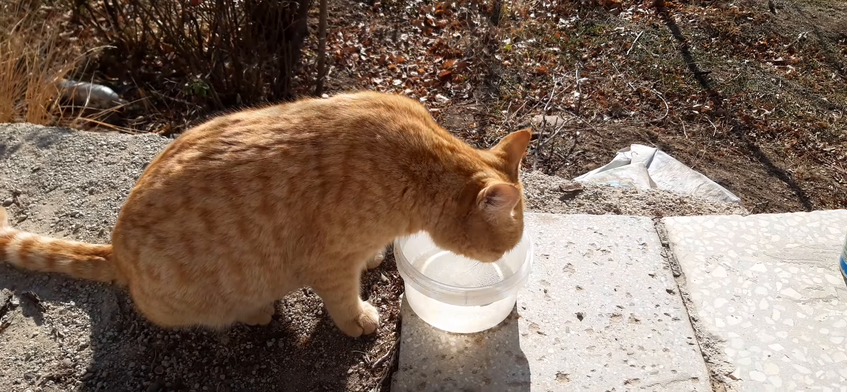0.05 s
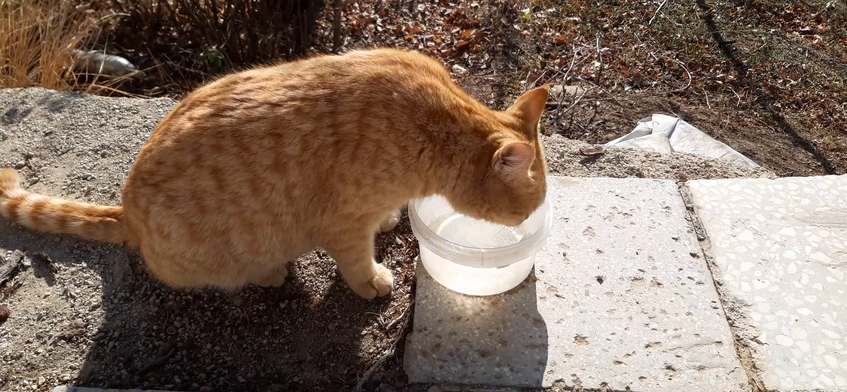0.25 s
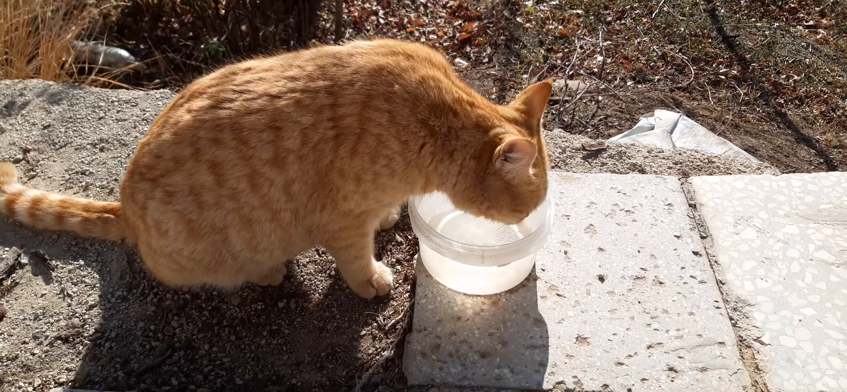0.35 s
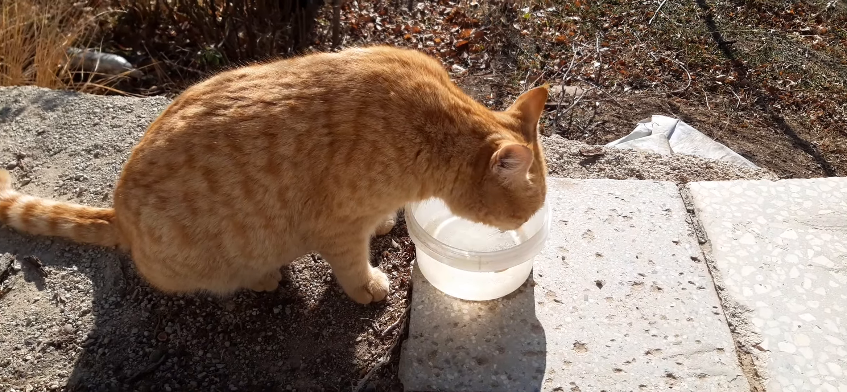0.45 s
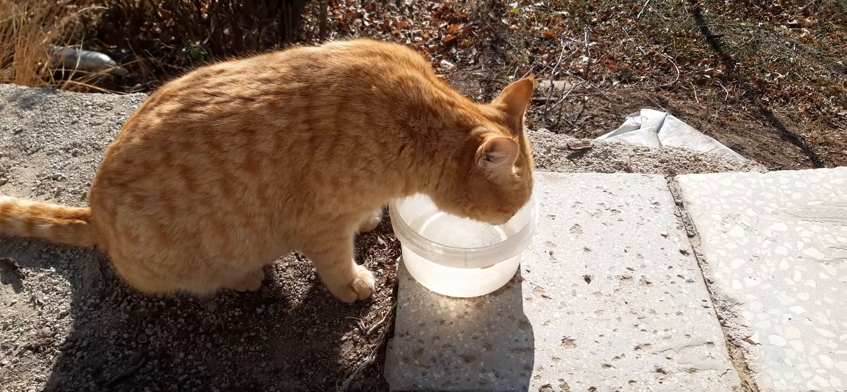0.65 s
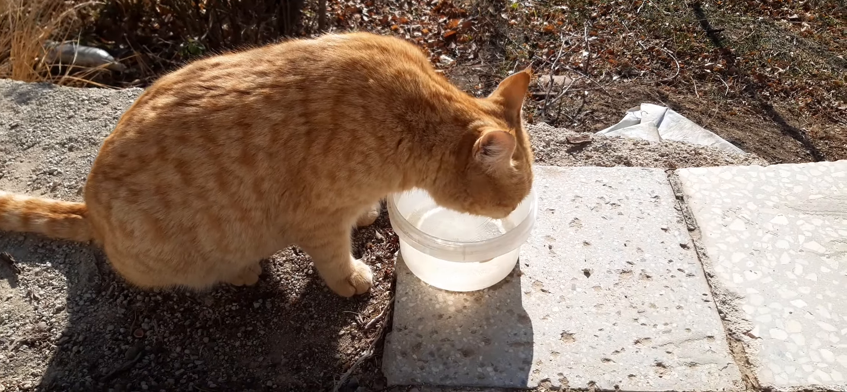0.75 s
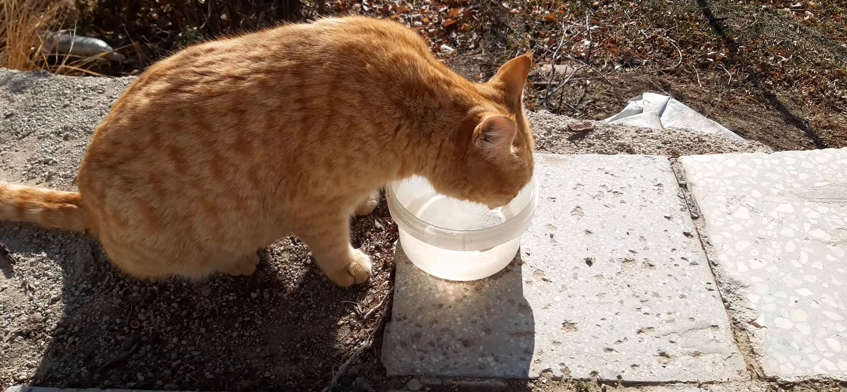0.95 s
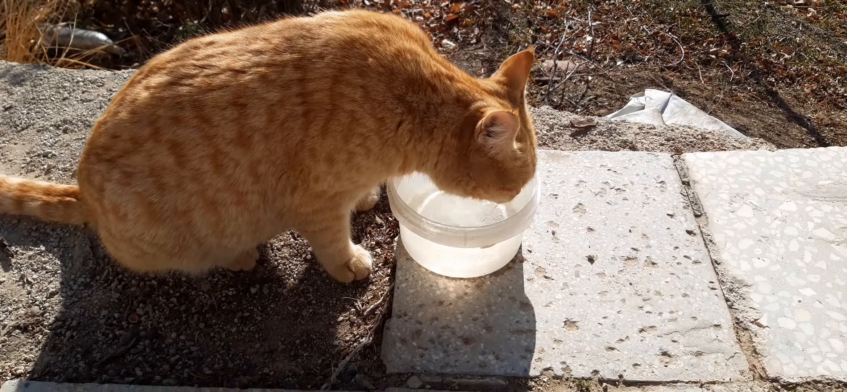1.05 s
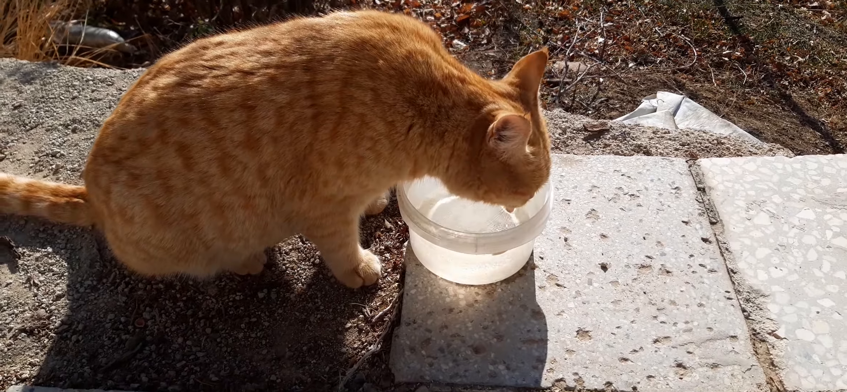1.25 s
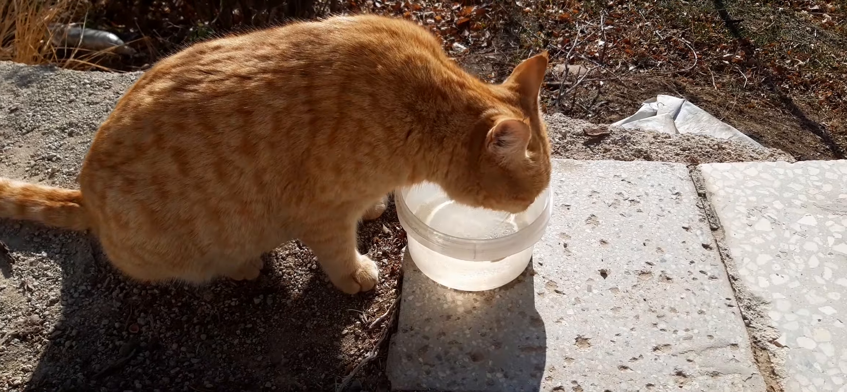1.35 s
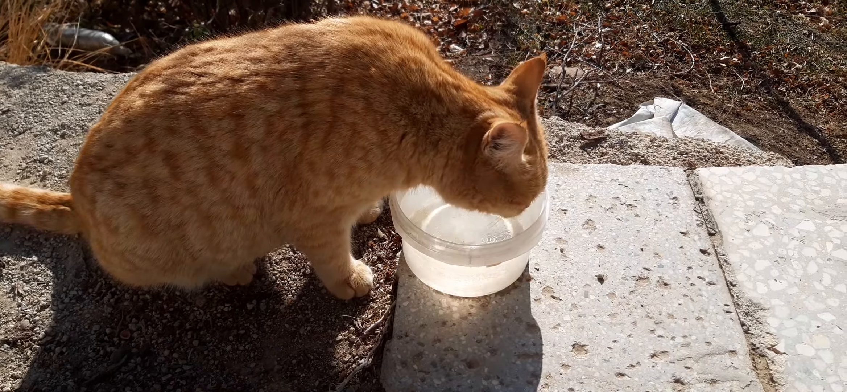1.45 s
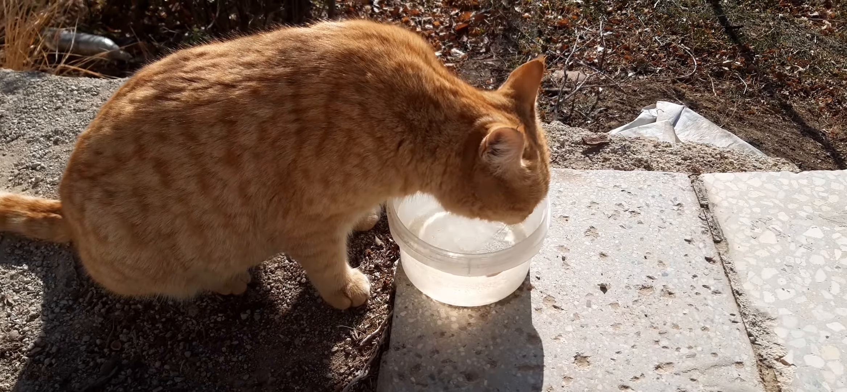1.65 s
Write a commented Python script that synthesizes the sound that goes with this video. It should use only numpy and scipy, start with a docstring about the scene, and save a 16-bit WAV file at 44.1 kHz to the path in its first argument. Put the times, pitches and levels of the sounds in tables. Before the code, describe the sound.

A cat laps water with faint wet ticks, over low wind rumble outdoors.

```python
"""A cat laps water from a plastic bowl on a patio, three to four laps a second.
From the start a light breeze flutters on two microphone ports, over a faint outdoor hiss.
The tongue makes soft wet ticks and tiny ringing bubbles. A few eddies (swirls of air) thump
the ports, hardest just after half a second. The loudest ticks come near the end, at about 1.3 s."""
import sys
import numpy as np
from scipy import signal
from scipy.fft import rfft, irfft, next_fast_len
from scipy.io import wavfile
from scipy.ndimage import uniform_filter1d

SR = 44100
rng = np.random.default_rng(int(sys.argv[2]) if len(sys.argv) > 2 else 0)


def to_wav(s):
    """Save 16-bit WAV."""
    ch = np.atleast_2d(s).T  # columns
    pcm = np.round(np.clip(ch, -1, 1) * 32767)  # PCM
    wavfile.write(sys.argv[1], SR, pcm.astype(np.int16))


N = 74970  # 1.7 s


def amp(db):
    """Turn decibels into a gain."""
    return 10 ** (np.asarray(db) / 20)


def unit(x):
    """Scale to an average (rms) level of 1."""
    return x / np.sqrt(np.mean(x ** 2) + 1e-20)


def along(points, hz):
    """Read between (f/Hz, value) points on a log frequency axis."""
    f, v = np.transpose(points)
    return np.interp(np.log(hz + 1), np.log(f + 1), v)


def curve(rows):
    """Join (t/s, value) points into one value per sample."""
    return np.interp(np.arange(N) / SR, *np.transpose(rows))


def filtered(x, response):
    """Multiply each frequency in x by response(hz)."""
    n = x.shape[-1]
    padded = next_fast_len(n + SR // 4)
    return irfft(rfft(x, padded) * response(np.fft.rfftfreq(padded, 1 / SR)), padded)[..., :n]


def noise(spectrum, size=N):
    """Two unrelated noises with the same tone colour, rms 1."""
    return unit(filtered(rng.standard_normal((2, size)), lambda hz: amp(along(spectrum, hz))))


def pan(db):
    """Left and right gains of constant power; positive db leans left."""
    return unit(amp([[db / 2], [-db / 2]]))


def fade(t, t60):
    """Die away by 60 dB in the time t60."""
    return np.exp(-np.log(1000) * t / t60)


def add(track, s, sound):
    """Mix a sound into a track at s seconds."""
    part = track[:, max(round(s * SR), 0):][:, :sound.shape[-1]]
    part += sound[..., :part.shape[-1]]


def lapping():
    """Each tick of the tongue is a wet snap, a tiny bubble that rings and a spatter of droplets."""
    # the bubbles: t/s, f/Hz, level/dB, fade time/ms, left minus right/dB
    bubbles = [ (0.065, 1900, -66, 14, 2), (0.3824, 2040, -61, 5.6, -1), (0.448, 9400, -67, 8.4, -10),
               (.5240, 8550, -67, 6.6, -17), (0.6041, 10200, -52, 2.1, -17), (0.6054, 2790, -55.5, 5.4, 3),
               (0.608, 1750, -60, 8, 10), (0.8594, 11100, -57.5, 2.2, -25), (0.8627, 2320, -56, 2.7, -3),
               (.9630, 2120, -69, 11, -7), (0.9772, 2200, -60.5, 6.6, -3), (.9780, 8600, -63, 4.8, -16),
               (1.116, 2310, -55, 17.4, -21), (1.2244, 2580, -54.5, 3.7, -15),
               (1.2704, 3006, -46.5, 16.4, 0.5), (1.2839, 2866, -63.5, 32, -6),
               (1.3775, 2120, -47.5, 2.3, 3), (1.3800, 5260, -40.5, 4.3, 4), (1.3804, 2760, -49, 6.2, 0),
               (1.3820, 4940, -61, 14, -2), (1.3826, 8500, -49, 4.4, -49), (1.3841, 10200, -54, 2.9, -39),
               (1.6563, 6000, -62, 7.4, 9), (1.6580, 2230, -51.5, 6.1, -14), (1.6586, 4800, -57, 6.2, 1)]
    # tone colour of the snap: f/Hz, level/dB
    snap_colour = [(300, -37), (1000, 6), (2300, -8), (3800, 1), (6000, -6.5), (10000, 2.5), (15000, -25)]
    out, size = np.zeros((2, N)), SR // 20
    t = np.arange(size) / SR
    ms = t * 1000
    mean_db = np.mean([row[2] for row in bubbles])
    for s, hz, db, t60_ms, pan_db in bubbles:
        attack = 1 - np.exp(-(ms / (0.047 * t60_ms)) ** 2)
        ring = amp(db) * np.sin(2 * np.pi * hz * t) * attack * fade(ms, t60_ms)
        splash = amp(0.34 * (db - mean_db))  # louder bubbles splash more
        snap = splash * amp(-67.5) * noise(snap_colour, size) * fade(ms, t60=3.1)
        add(out, s, pan(pan_db) * (ring + snap))
        for late, pitch, loud, side in rng.standard_normal((5, 4)):  # five random droplets
            droplet_hz, delay_s = 2700 * np.exp(0.6 * pitch), 0.02 * abs(late)
            droplet = np.sin(2 * np.pi * droplet_hz * t) * fade(ms, t60=5)
            add(out, s + delay_s, pan(4 * side) * splash * amp(-73.5 + 2 * loud) * droplet)
    return out


def bowl_and_patio(laps):
    """The laps ring briefly inside the bowl and echo faintly around the patio."""
    # tone colour of both echoes: f/Hz, level/dB
    echo_colour = [(300, -28), (1500, -1), (2400, 0.5), (3800, -15), (6000, 0), (12000, -21.5)]
    size = SR // 2
    t = np.arange(size) / SR
    echo = 0
    for db, t60_s in ((-8.5, 0.04), (-12, 0.3)):  # bowl, then patio
        tail = unit(noise(echo_colour, size) * fade(t, t60_s))
        echo = echo + amp(db) * tail / np.sqrt(size)
    return signal.fftconvolve(laps.mean(0)[None], echo, axes=1)[:, :N]


def flutter(wind_db):
    """Churning air rumbles on each port separately, following the wind there."""
    # tone colour of the rumble: f/Hz, level/dB
    rumble_colour = [(15, -33), (30, -21), (52, 3.5), (105, 8), (150, -8), (220, -20.5), (320, -24.5),
                     (430, -41.5), (900, -55), (2000, -100)]
    rumble = noise(rumble_colour)
    window = signal.windows.hann(int(0.036 * SR))
    power = signal.fftconvolve(np.abs(signal.hilbert(rumble)) ** 2, window[None], 'same', axes=1)
    steady = unit(rumble / np.sqrt(np.abs(power)))  # evened out, so the wind sets the level
    low_cut_hz = 24.3  # the microphone sheds the deepest bass
    return filtered(amp(wind_db) * steady, lambda hz: hz ** 4 / (hz ** 4 + low_cut_hz ** 4))


def eddies():
    """Each eddy is a smooth push and a puff of rough air; the microphone's bass filter rings after it."""
    # eddies that hit a port: t/s, level/dB, half width/ms, left minus right/dB
    hits = [(.0450, -31, 2.88, 33), (0.173, -40.5, 2.1, 32), (0.2288, -28.5, 2.24, 25.5),
            (0.3939, -26, 2.11, -30), (0.561, -17, 1.47, 15), (0.5952, -26.5, 1.17, 35),
            (.6112, -22.5, 2.5, 8), (0.6311, -27, 1.48, -11.5), (0.6846, -22.5, 3.05, 38),
            (.9100, -31, 3.46, 13), (1.1590, -26.5, 4.07, 22)]
    # tone colour of the puff: f/Hz, level/dB
    puff_colour = [(100, -22), (300, 4), (700, -4), (1100, -23), (2000, -36)]
    puff_ms, port_hz, port_q = 9.2, 95, 1.65  # a higher q rings longer
    out, rough = np.zeros((2, N)), amp(-57.5) * noise(puff_colour)
    top_db = max(row[1] for row in hits)
    for s, db, width_ms, pan_db in hits:
        since_ms = (np.arange(N) / SR - s) * 1000
        push = amp(db) * np.exp(-(since_ms / width_ms) ** 2)
        puff = amp(1.9 * (db - top_db)) * rough * np.exp(-(since_ms / puff_ms - 0.5) ** 2)
        out += pan(pan_db) * (puff - push)
    return filtered(out, lambda f: -f * f / (port_hz ** 2 - f * f + 1j * f * port_hz / port_q))


def gust_hiss(wind_db):
    """A high hiss swells with the gusts."""
    # tone colour of the gusts: f/Hz, level/dB
    gust_colour = [(500, -5), (2000, 0), (6000, -5), (9000, -10), (14000, -4.5)]
    gust = uniform_filter1d(amp(wind_db).mean(0), size=4400)  # smoothed over 0.1 s
    return amp(-72) * (gust / gust.max()) ** 0.84 * noise(gust_colour)


def outdoor_air():
    """Steady outdoor hiss, with left and right a little more alike in the bass."""
    # tone colour of the air: f/Hz, level/dB
    air_colour = [(40, 14.5), (200, 4), (450, 0), (620, -1.5), (820, 0.5), (1250, -10), (2300, -7.5),
                  (3600, -17.5), (6300, -14.5), (8000, -17), (10500, -15.5), (13300, -11.5), (16000, -17)]
    # how alike left and right are: f/Hz, likeness (0 to 1)
    likeness = [(100, 0.25), (800, 0.17), (2500, 0.039), (8000, 0.033)]

    def mid_and_side(hz):
        """Gains for the part both ears share and the part that is opposite."""
        angle = np.arccos(np.clip(along(likeness, hz), -1, 1)) / 2
        return np.array([np.cos(angle), np.sin(angle)])
    mid, side = filtered(noise(air_colour), mid_and_side)
    return amp(-72) * unit(np.array([mid + side, mid - side]))


def thin_hiss():
    """A very faint, thin hiss on the left grows towards the end."""
    # tone colour of the hiss: f/Hz, level/dB
    colour = [(1500, -21), (2400, -3.5), (4200, -12.5), (5400, -9.5), (6500, -1.5), (7300, -16),
              (12000, -44)]
    # its slow rise: t/s, level/dB
    rise = [(0, -96), (.35, -86.5), (.6, -86), (.95, -86), (1.15, -81.5), (1.33, -82.5), (1.45, -78.5),
            (1.7, -79)]
    return pan(db=8) * amp(curve(rise)) * noise(colour)


def scene():
    """The cat at its bowl, the wind on the ports and the hiss behind them."""
    # wind on the left and on the right port: t/s, level/dB
    wind_left = [(0, -47), (.040, -48.5), (.070, -49), (.108, -61), (.128, -44), (.185, -52), (.21, -49),
                 (.24, -42), (.275, -52.5), (.32, -68.5), (.42, -64), (.455, -59), (.486, -41.5),
                 (.509, -53), (.554, -55), (.696, -40), (.76, -64.5), (.815, -46), (.875, -43), (.942, -59),
                 (1.04, -67), (1.105, -44), (1.160, -41.5), (1.205, -60.5), (1.362, -77.5), (1.402, -40),
                 (1.474, -42.5), (1.527, -67.5), (1.7, -96)]
    wind_right = [(0, -93), (.19, -81), (.254, -48.5), (.32, -59.5), (.365, -69), (.385, -34.5), (.42, -38),
                  (.456, -63.5), (.546, -36.5), (.65, -36), (.712, -63), (.735, -38), (.815, -66),
                  (.846, -56.5), (.915, -55.5), (1.018, -76), (1.11, -88), (1.14, -63), (1.265, -68),
                  (1.302, -54.5), (1.414, -91), (1.455, -45), (1.534, -83), (1.606, -56), (1.7, -72.5)]
    wind_db = np.array([curve(wind_left), curve(wind_right)])
    laps = lapping()
    cat = laps + bowl_and_patio(laps)
    breeze = flutter(wind_db) + eddies()
    hiss = outdoor_air() + gust_hiss(wind_db) + thin_hiss()
    return cat + breeze + hiss


def record(dry):
    """Cut away the very highest treble."""
    return filtered(dry, lambda hz: hz < 15700)


dry = scene()
out = record(dry)
to_wav(out)
```